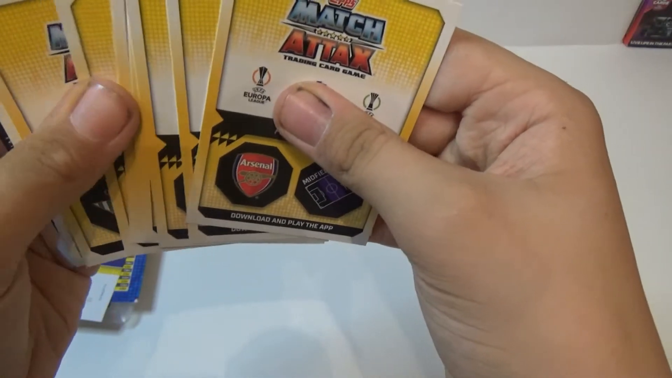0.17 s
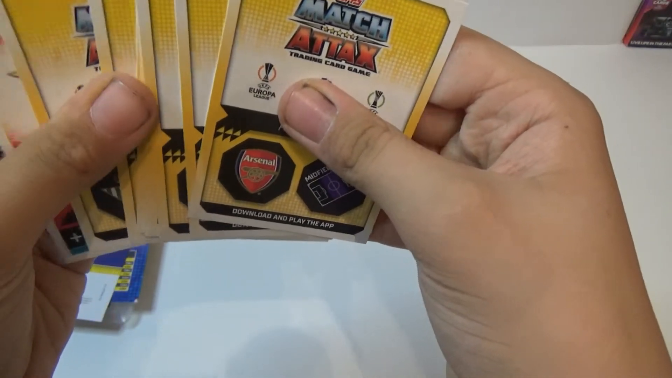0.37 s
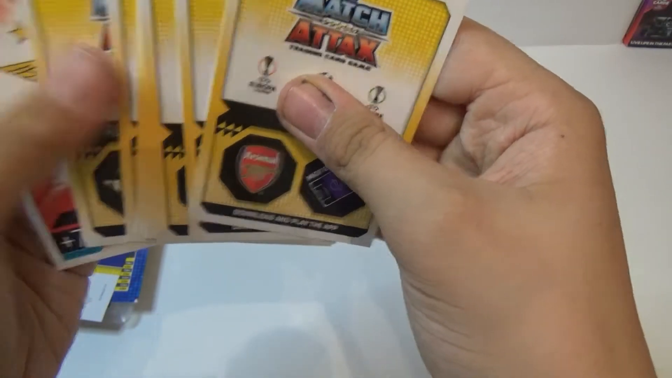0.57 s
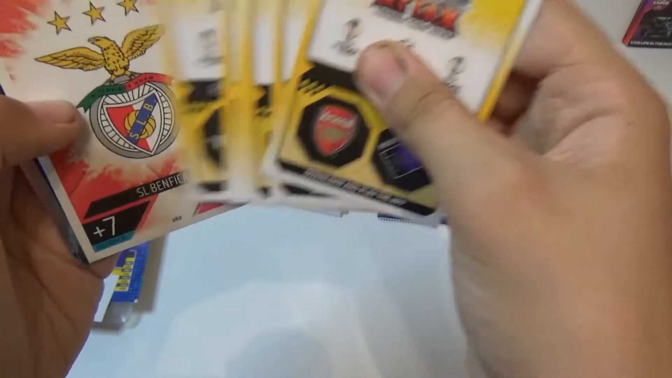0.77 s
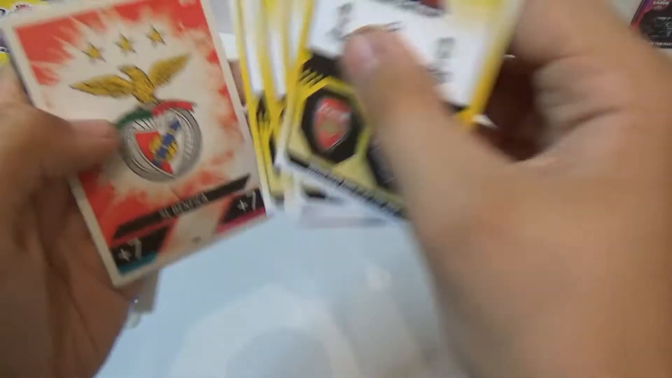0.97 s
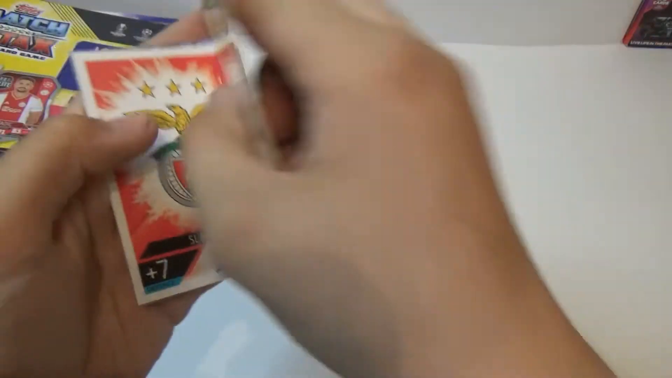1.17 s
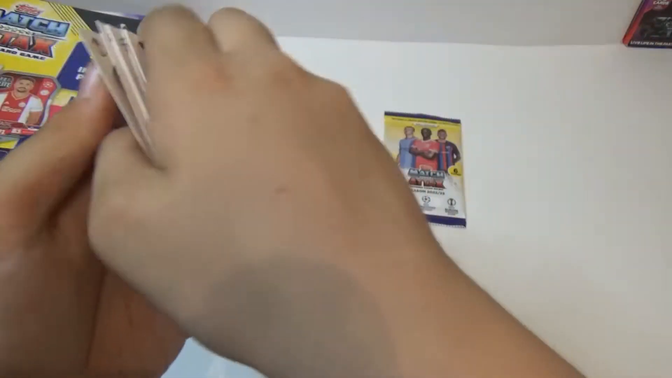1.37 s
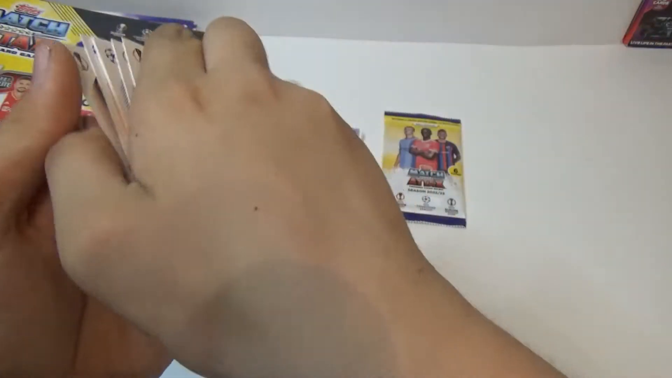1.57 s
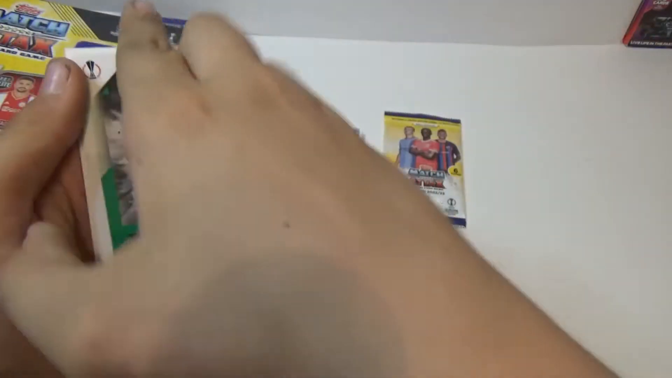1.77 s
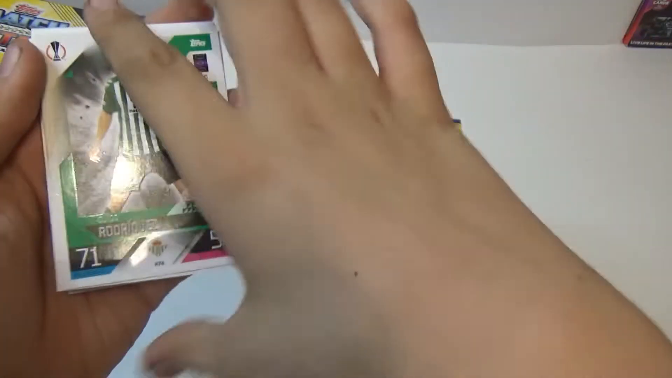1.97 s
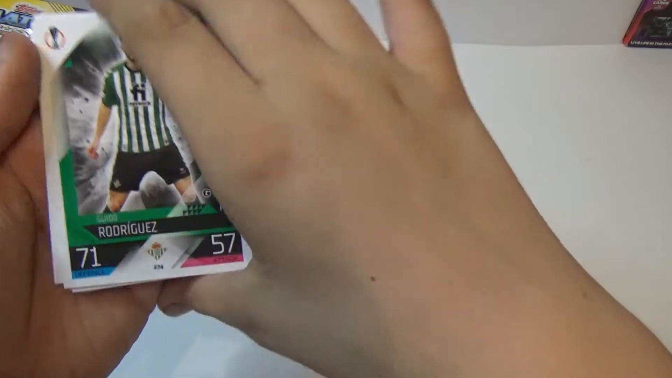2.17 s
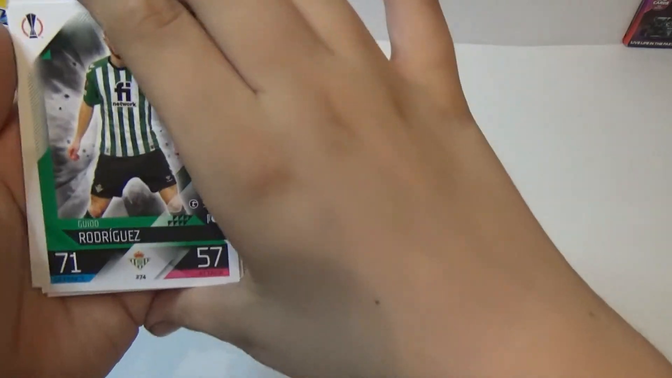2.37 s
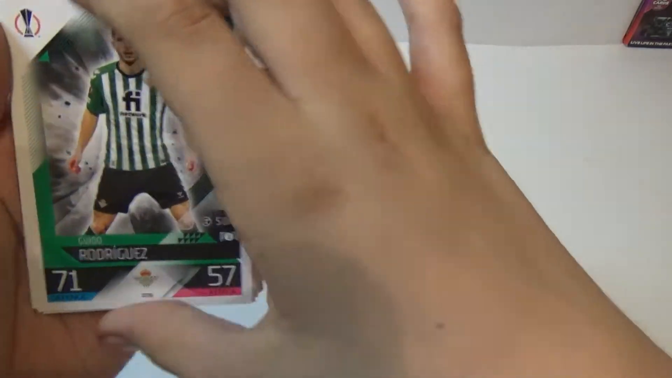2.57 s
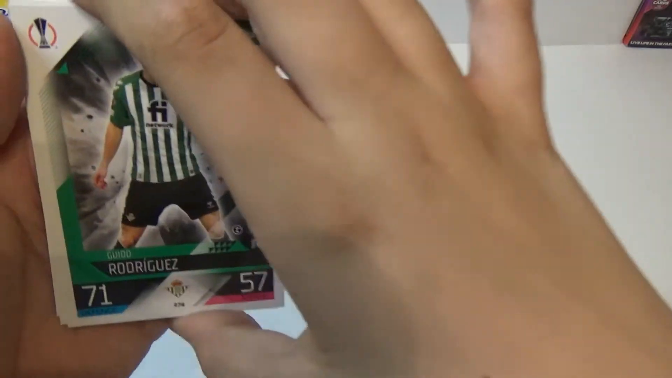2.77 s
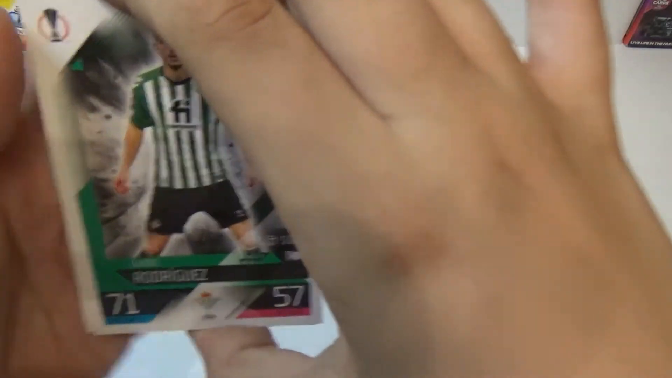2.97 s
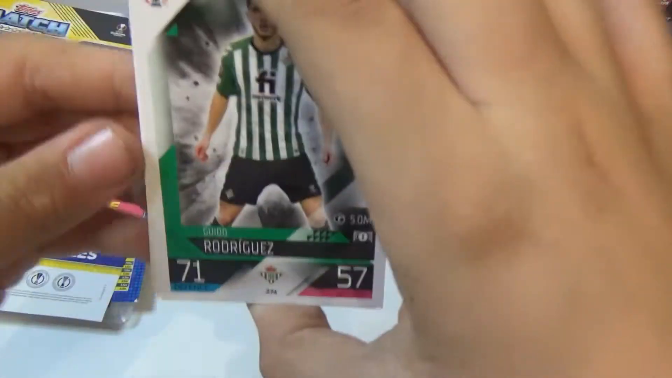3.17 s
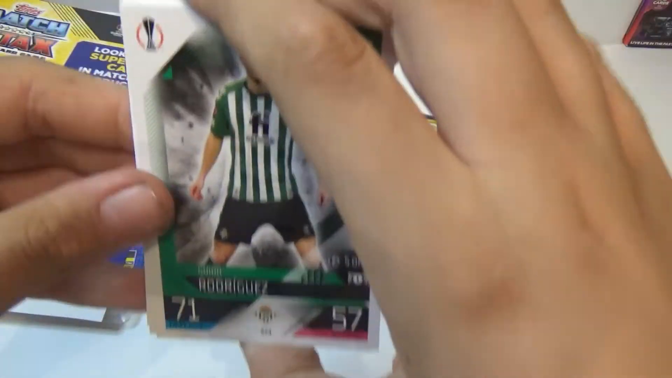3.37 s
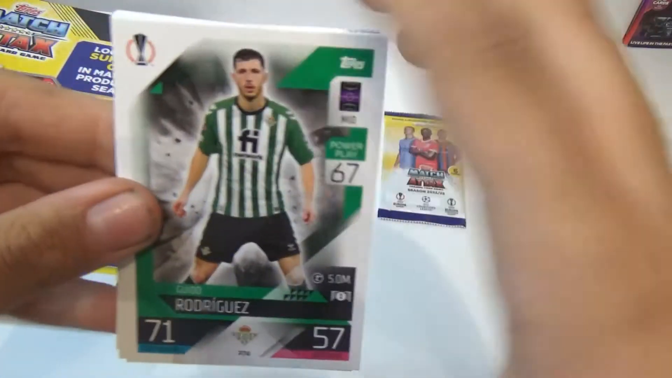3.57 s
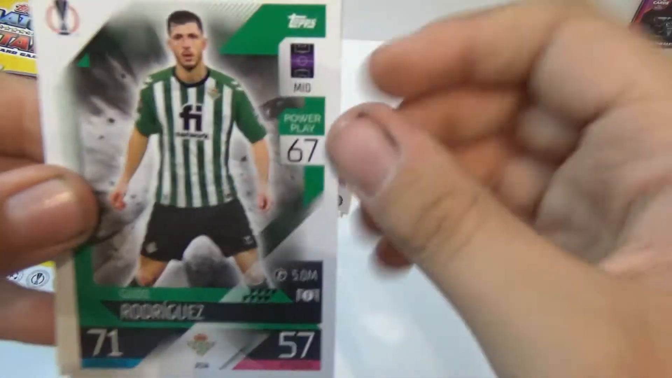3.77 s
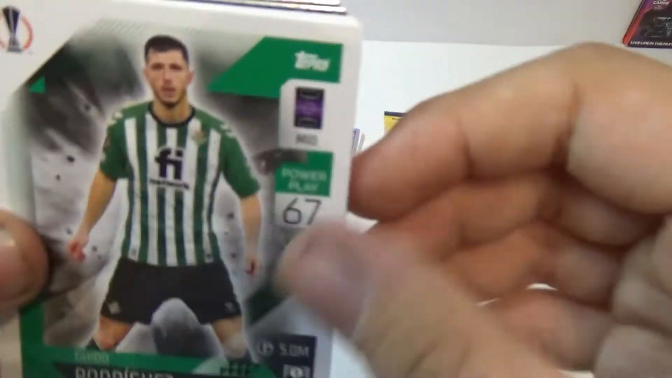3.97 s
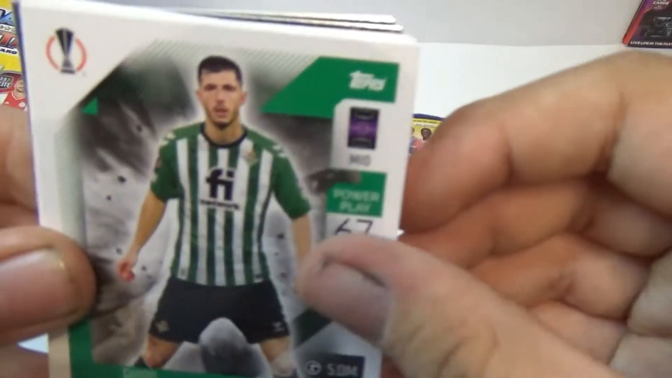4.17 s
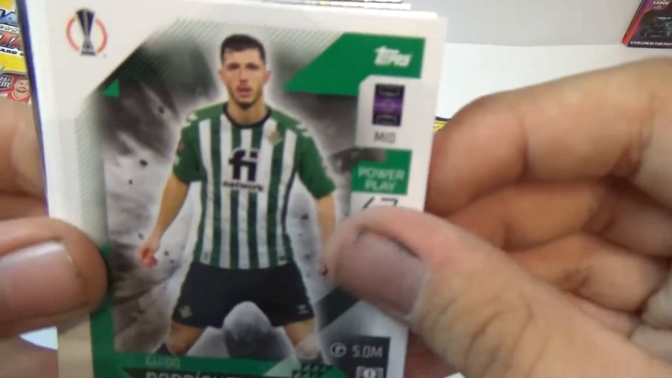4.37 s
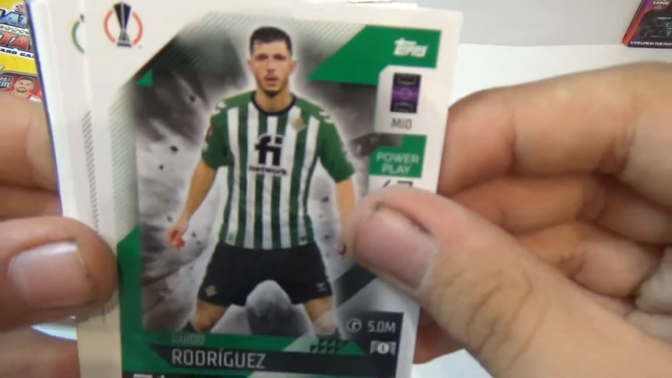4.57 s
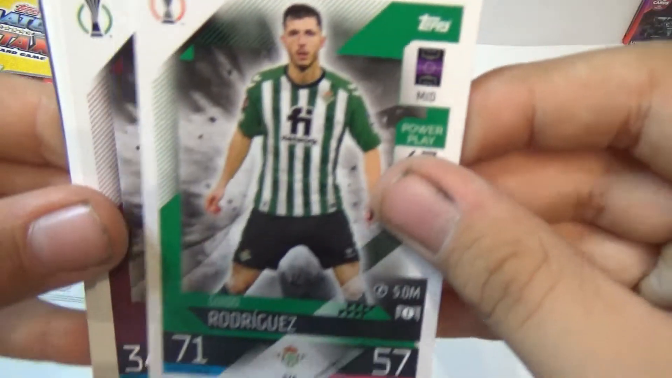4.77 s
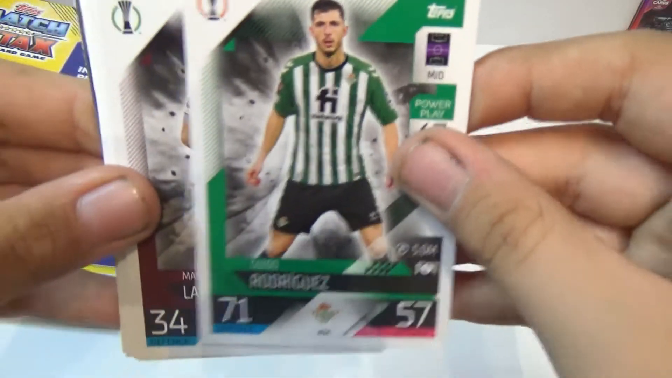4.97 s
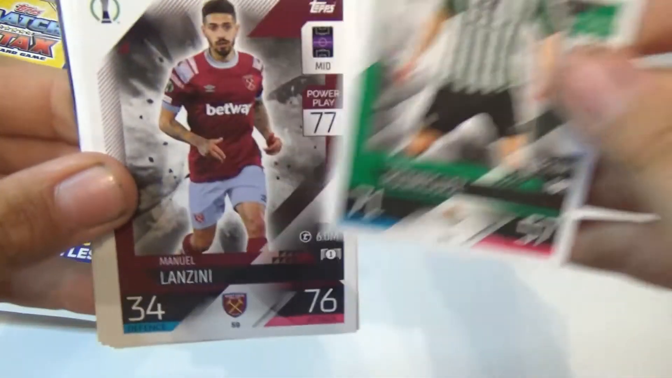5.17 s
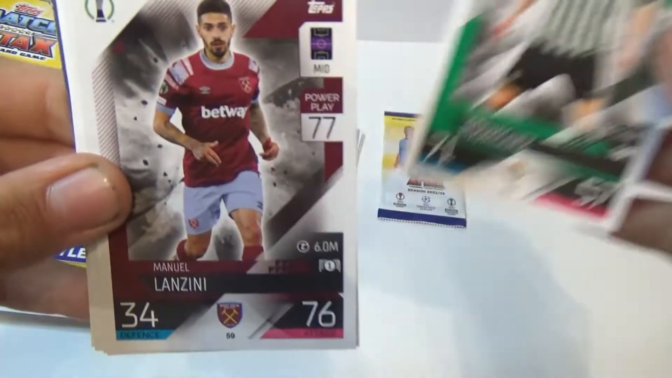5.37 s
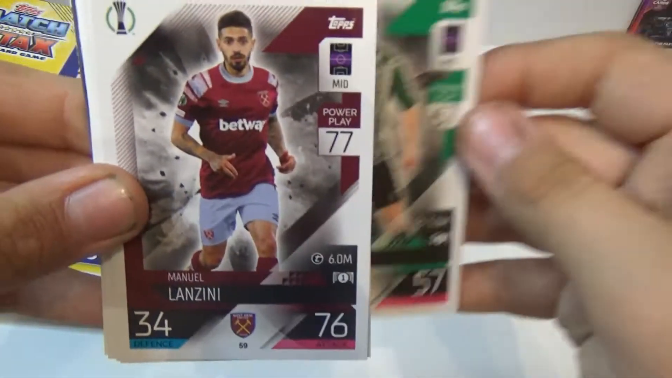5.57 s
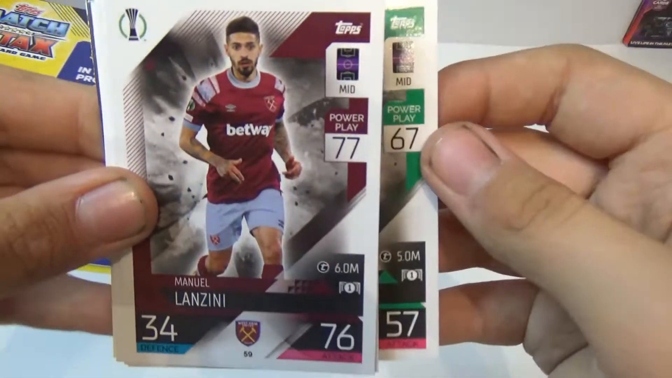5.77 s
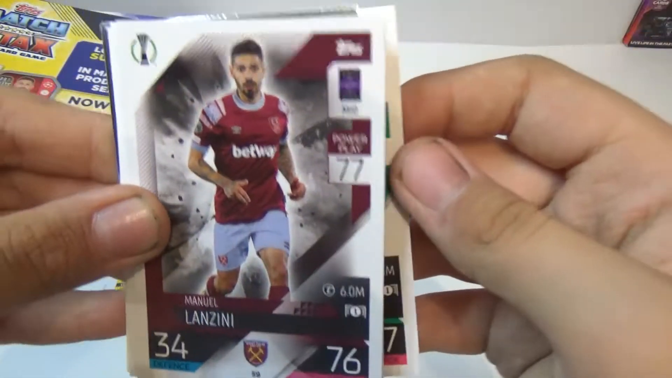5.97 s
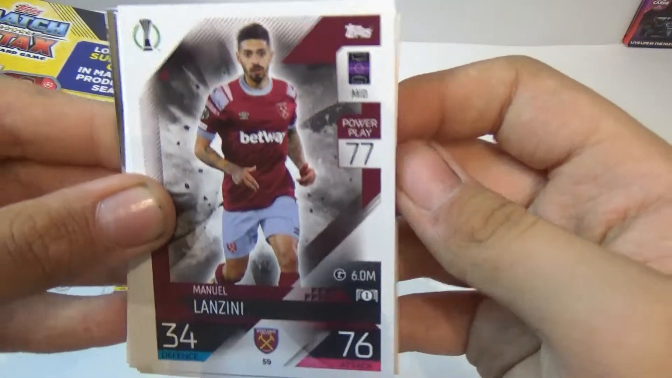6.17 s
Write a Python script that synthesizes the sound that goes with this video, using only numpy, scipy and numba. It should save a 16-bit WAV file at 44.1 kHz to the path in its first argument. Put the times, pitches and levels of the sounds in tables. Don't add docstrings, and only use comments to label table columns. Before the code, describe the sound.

A small quiet room, closely miked in stereo: a steady soft hush and faint fast camera-motor ticking. Stiff cards rustle and swish, edges click and corners flick, busiest in the first two seconds with a crisp crack. Afterwards there are only gentle slides and sparse taps, then a firm drag ending in one loud snap and faint final scuffs.

```python
import sys
import numpy as np
from scipy import signal
from scipy.fft import rfft, irfft
from scipy.io import wavfile
from numba import njit

SR = 44100
rng = np.random.default_rng(int(sys.argv[2]) if len(sys.argv) > 2 else 0)


def decibels_to_gain(level_db):
    exponent = np.asarray(level_db, float) / 20
    return 10 ** exponent


def unload_audio(sound):
    columns = np.transpose(np.atleast_2d(sound))
    steps = np.round(np.clip(columns, -1, 1) * 32767)
    wavfile.write(sys.argv[1], SR, steps.astype(np.int16))


N = 273684
RUB_PAN_DB = 1


def rms_one(x):
    return x / np.sqrt(np.mean(x ** 2) + 1e-20)


def at_hz(points, hz):
    point_hz, level_db = np.array(points).T
    return np.interp(np.log(hz + 1), np.log(point_hz), level_db)


def over_time(points):
    return np.interp(np.arange(N) / SR, *np.transpose(points))


def band(x, low, high):
    return signal.sosfilt(signal.butter(2, [low, min(high, .45 * SR)], "band", fs=SR, output="sos"), x)


def drift(rate):
    r = np.exp(-80 * np.pi * rate / SR)
    slow = signal.lfilter([1], [1, -2 * r, r * r], rng.standard_normal(N // 40 + 2002))[2000:]
    return np.interp(np.arange(N) / 40, np.arange(len(slow)), rms_one(slow))


def add(out, s, sound, pan_db):
    at = max(round(s * SR), 0)
    n = min(np.shape(sound)[-1], N - at)
    panned = sound * decibels_to_gain(np.array([[pan_db / 2], [-pan_db / 2]]))
    out[:, at:at + n] += panned[:, :n]


def glide(t, first_hz, last_hz, glide_ms):
    tau = glide_ms / 1000
    return 2 * np.pi * (last_hz * t + (first_hz - last_hz) * tau * (1 - np.exp(-t / tau)))


@njit
def moving_resonance(x, hz, r, sr):
    out = np.zeros(len(x))
    for i in range(2, len(x)):
        drive = x[i] - x[i - 2]
        out[i] = drive + 2 * r * np.cos(2 * np.pi * hz[i] / sr) * out[i - 1] - r * r * out[i - 2]
    return out


# (f/Hz, level/dB per Hz)
HUSH_MID_COLOUR = [(18, -56), (30, -28), (194, -0.5), (350, 2), (560, 0), (760, 3), (1040, -2.5), (1320, 3),
                   (1810, -3), (2060, -0.5), (2290, -1), (2680, -2), (3580, -5), (7470, -9), (9710, -8.5),
                   (14800, -10.5), (16000, -20)]
# (f/Hz, level/dB per Hz)
HUSH_SIDE_COLOUR = [(15, -86), (25, -56), (75, -40), (202, -14.5), (422, -4), (1300, -2), (1430, 0),
                    (1900, -5.5), (2050, -5), (3320, -10.5), (8100, -20.5), (9440, -26), (11000, -57),
                    (14300, -79), (22000, -120)]


def hush():
    hz = np.arange(N // 2 + 1) * SR / N
    layers = []
    for colour, level_db in ((HUSH_MID_COLOUR, -56.5), (HUSH_SIDE_COLOUR, -58)):
        spectrum = rfft(rng.standard_normal(N)) * decibels_to_gain(at_hz(colour, hz))
        layers.append(decibels_to_gain(level_db + .5 * drift(5.7)) * rms_one(irfft(spectrum, N)))
    mid, side = layers
    mid += decibels_to_gain(-80) * rms_one(band(rng.standard_normal(N), 10000, 19000))
    return np.array([mid + side, mid - side])


# (t/s, even level/dB, odd level/dB)
FOCUS_PUSH = [(0, -60, -49.5), (2.2, -55, -50), (2.4, -56, -52.5), (2.6, -57, -55), (2.72, -53.5, -54),
              (3.0, -54, -52), (3.4, -53.5, -52.5), (3.5, -55, -54), (3.56, -56, -50), (3.7, -58, -50.5),
              (3.85, -52.5, -52.5), (3.95, -52.5, -55), (4.25, -53, -54), (4.35, -50.5, -53),
              (4.45, -53, -51), (4.6, -53, -52.5), (4.72, -57, -52), (4.82, -55, -54), (4.9, -51.5, -52),
              (5.9, -53, -52), (6.0, -55, -51), (6.2, -54, -51)]


def focus_motor():
    step_s, wander, housing_hz = .04, .022, 2085
    # delay ms, last Hz, glide ms, chirp ms, housing ring dB
    quick_gait = (4.4, 2350, 2.5, 4.6, -56)
    slow_gait = (-4.5, 2400, 4.0, 12.0, -80)
    early_gait = (-1.5, 2350, 3.0, 6.0, -62)
    out, t = np.zeros((2, N)), np.arange(1500) / SR
    push_s, even_db, odd_db = np.transpose(FOCUS_PUSH)
    chance = rng.standard_normal((int(N / SR / step_s) + 1, 3))
    for k, (push, ring, turn) in enumerate(chance):
        s = k * step_s
        gait = slow_gait if 4.39 <= s < 5.97 else quick_gait
        if 4.47 <= s < 4.86:
            gait = early_gait
        delay_ms, last_hz, glide_ms, chirp_ms, ring_db = gait
        push_db = np.interp(s, push_s, odd_db if k % 2 else even_db) + 1.2 + .6 * push
        port_phase = turn + np.array([[.4], [0]])
        phase = glide(t, 3140, last_hz, glide_ms) * (1 + wander * ring) + port_phase
        chirp_shape = np.sin(np.pi * np.minimum(t * 1000 / chirp_ms, 1)) ** .7
        step = decibels_to_gain(push_db) * chirp_shape * np.sin(phase)
        ring_start_s, ring_length_s = np.array([[.007], [.004]]), np.array([[.017], [.021]])
        swell = np.sin(np.pi * np.clip((t - ring_start_s) / ring_length_s, 0, 1))
        hum = 2 * np.pi * housing_hz * t + 3 * turn + np.array([[1.9], [0]])
        step += decibels_to_gain(ring_db + 2 * (-1) ** k + 1.5 * ring) * swell * np.sin(hum)
        step += decibels_to_gain(ring_db - 5) * np.exp(-((t - .006) / .002) ** 2) * np.sin(2 * hum[1])
        add(out, s + delay_ms / 1000, step, 0)
    return out


# (t/s, hiss level/dB)
GRIP = [(0.0, -52.5), (0.34, -55), (0.67, -51), (0.81, -52), (1.0, -43.5), (1.42, -45.5), (1.73, -47.5),
        (1.86, -53), (3.04, -57.5), (4.83, -59), (5.25, -55), (5.35, -59), (5.59, -59), (6.2, -54)]


def stirred_air():
    busy_db = over_time(GRIP) + 55
    swing_db = 7 * drift(5)
    mid, side = band(rng.standard_normal((2, N)), 15, 116) * decibels_to_gain(swing_db + .8 * busy_db)
    return decibels_to_gain(-89.5) * rms_one(np.array([mid + .3 * side, mid - .3 * side]))


# (start t/s, length/ms, hiss level/dB, moment of most pressure/0-1)
GLIDES = [(0.02, 140, -51, 0.47), (0.21, 63, -46.5, 0.74), (0.38, 115, -52.5, 0.43),
          (0.465, 30, -47.5, 0.63), (0.665, 180, -44.5, 0.45), (0.902, 26, -42, 0.05),
          (1.064, 97, -35, 0.42), (1.628, 75, -34.5, 0.47), (1.699, 68, -37, 0.29), (1.799, 89, -40, 0.41),
          (1.879, 32, -47, 0.5), (2.134, 55, -46.5, 0.13), (2.488, 33, -44.5, 0.3), (2.686, 23, -50.5, 0.5),
          (2.714, 70, -49.5, 0.44), (3.035, 52, -48.5, 0.82), (3.15, 57, -52, 0.8), (3.515, 40, -41.5, 0.2),
          (3.865, 81, -46, 0.16), (4.075, 39, -50.5, 0.1), (4.34, 100, -57, 0.7), (4.46, 70, -50, 0.05),
          (4.855, 20, -51, 0.16), (5.003, 50, -48.5, 0.4), (5.095, 66, -49, 0.3), (5.5, 44, -58, 0.74),
          (5.87, 59, -49.5, 0.43), (0.735, 45, -44, 0.9), (1.05, 22, -44, 0.5), (1.148, 22, -42, 0.5),
          (1.626, 12, -39, 0.1), (1.694, 14, -41, 0.5), (1.775, 28, -50, 0.8), (3.24, 14, -53, 0.3),
          (3.3, 30, -56, 0.4), (3.373, 10, -52, 0.1), (5.06, 36, -57, 0.5)]
SCRAPES = [(0.52, 79, -48.5, 1), (1.159, 84, -37.5, 0.2), (1.36, 176, -49, 0.66), (1.578, 26, -39, 0.75),
           (1.605, 8, -42, 0.5), (2.06, 45, -48, 0.4), (2.2, 170, -50, 0.14), (2.418, 33, -53.5, 0.2),
           (2.91, 37, -51.5, 0.25), (2.95, 41, -56.5, 0.4), (3.2605, 11, -42, 0.7), (4.64, 62, -53, 0.5),
           (5.37, 63, -55.5, 0.2), (5.98, 28, -51.5, 0)]
DRAGS = [(1.0, 59, -43, 0.86), (1.23, 50, -45.5, 0), (1.321, 24, -45, 0.3), (4.0, 29, -55, 0.86),
         (5.129, 126, -39.5, 0.66), (5.621, 33, -46, 0.17), (5.659, 43, -46, 0.18), (5.7, 51, -57.5, 0.24),
         (6.04, 30, -60, 0.34), (6.15, 72, -47, 0.98)]
PUSHES = [
    (0.815, 39, -51, 0.3),
    (3.74, 130, -59.5, 0.57),
    (5.13, 54, -55, 0.63),
    (5.255, 96, -64.5, 0.4),
]
SWEEP = [
    (0.762, 142.4, -30.5, 0.5),
]


def pressure():
    grip_db = over_time(GRIP) + np.array([[-3.0], [-9.0], [-9.0]])
    power = decibels_to_gain(2 * grip_db)
    # strokes, rasp and body in dB against their hiss
    kinds = ((GLIDES, -9, -10.5), (SCRAPES, -4, -7.5), (DRAGS, -3.5, -3.5), (PUSHES, -0.5, 7),
             (SWEEP, -12.5, -8.5))
    for rows, rasp_db, body_db in kinds:
        for start_s, length_ms, hiss_db, top in rows:
            at = round((start_s - .002) * SR)
            length_ms = length_ms + 5
            u = np.linspace(0, 1, round(length_ms * SR / 1000))[:N - at]
            top = np.clip(top, .03, .97)
            edges = np.minimum(np.minimum(u, 1 - u) * length_ms / (2.5 + .09 * length_ms), 1)
            swell_db = -(5 + 0.23 * length_ms) * np.abs(u - top) ** 2.08
            level_db = hiss_db + swell_db + np.array([[0], [rasp_db], [body_db]])
            power[:, at:at + len(u)] += (edges * decibels_to_gain(level_db)) ** 2
    return np.sqrt(power)


def slips(per_s, spread_db):
    sizes = decibels_to_gain(spread_db * np.minimum(rng.exponential(1, N), 5)) * rng.choice([-1, 1], N)
    happens = rng.random(N) < per_s / SR
    return rms_one(sizes * happens * decibels_to_gain(0.76 * drift(71)))


CARD_RINGS_HZ = [1350, 1784, 2556, 3480, 4390, 5400, 6100, 7000, 8400, 9300, 10690]


def card_rings(grains):
    hiss, rasp, body = np.zeros((3, N))
    for hz in CARD_RINGS_HZ:
        ring = rms_one(band(grains, hz * .97, hz * 1.03)) * decibels_to_gain(-19 + 4 * drift(35))
        layer = hiss if hz > 5000 else rasp if hz > 2500 else body
        layer += ring
    return np.array([hiss, rasp, body])


# (f/Hz, level/dB per Hz within each of hiss, rasp and body)
RUB_COLOUR = [(300, -12.5), (600, 0.5), (1300, 5.5), (2800, 5), (5000, 4.5), (7500, 5), (9700, 6),
              (12000, -0.5), (16000, -23)]
# (t/s, resonance f/Hz)
GAP = [(0, 5300), (.2, 5400), (.4, 9700), (.72, 9300), (.765, 5400), (.835, 6150), (.85, 9100),
       (1.66, 10200), (1.72, 7000), (1.85, 9300), (4.5, 10400), (4.67, 10000), (5.02, 6100), (5.15, 9900),
       (5.24, 4580), (5.9, 6300), (6.2, 6200)]
# (t/s, resonance f/Hz)
SPAN = [(0, 1310), (.78, 850), (.83, 1200), (.9, 1400), (1.2, 1570), (3.8, 1350), (5.1, 865), (5.24, 875),
        (5.6, 780), (6.2, 1320)]


def rub():
    gap_width_hz, span_width_hz = 900, 350
    grains = [slips(8000, 2.8), slips(7000, 2.4)]
    ranges = {"body": 0, "rasp": 0, "hiss": 0}
    edges = 315 * 2 ** np.arange(0, 5.8, 1 / 3)
    for k, (low, high) in enumerate(zip(edges, edges[1:])):
        name = "body" if high < 2600 else "rasp" if high < 5100 else "hiss"
        patch = decibels_to_gain(at_hz(RUB_COLOUR, np.sqrt(low * high)) + 2.0 * drift(30))
        ranges[name] = ranges[name] + patch * band(grains[k % 2], low, high)
    gap_hz = over_time(GAP) * (1 + 0.013 * drift(27))
    gap = moving_resonance(grains[0], gap_hz, np.exp(-np.pi * gap_width_hz / SR), SR)
    span = moving_resonance(grains[1], over_time(SPAN), np.exp(-np.pi * span_width_hz / SR), SR)
    hiss = rms_one(ranges["hiss"]) + decibels_to_gain(-10.5) * rms_one(gap)
    body = rms_one(ranges["body"]) + decibels_to_gain(-4) * rms_one(span)
    faces = np.array([hiss * decibels_to_gain(-1.5), rms_one(ranges["rasp"]), rms_one(body)])
    faces = faces + card_rings(grains[1])
    press = pressure()
    mid = np.sum(press * faces * decibels_to_gain(-1.57), axis=0)
    brighter = (press[0] / decibels_to_gain(-37)) ** .3
    mid += decibels_to_gain(-15) * press[0] * brighter * rms_one(band(grains[1], 11230, 15400))
    side = decibels_to_gain(-15) * band(np.roll(mid, 23), 3300, 10300)
    scatter = np.sum(press * np.roll(faces, 5000, axis=1), axis=0)
    side += decibels_to_gain(-17.5) * band(scatter, 1500, 9400)
    return np.array([mid + side, mid - side]) * decibels_to_gain(np.array([[RUB_PAN_DB / 2], [-RUB_PAN_DB / 2]]))


def contacts(rows, length_ms, swell, width, click, gain_db):
    out, t = np.zeros((2, N)), np.arange(2500) / SR
    noise = rng.standard_normal((len(rows), 2, len(t)))
    for (s, peak_db, hz, thump_db), (bright, dull) in zip(rows, noise):
        u = t / (max(length_ms, .2) / 1000)
        shape = (1 - np.exp(-u / swell)) * np.exp(-u ** 2 - u / 2)
        sharp = rms_one(band(bright, hz / width, hz * width)) + .5 * rms_one(band(bright, 4600, 10900))
        edge = band((t == t[8]) * 1.0, hz / 1.7, min(hz * 2.1, 12000))
        thump = decibels_to_gain(thump_db) * rms_one(band(dull, 285, 2350)) * shape ** 0.86
        puff = shape * sharp + click * edge / edge.max() + thump
        add(out, s + .0004, decibels_to_gain(peak_db + gain_db) * puff, RUB_PAN_DB)
    return band(out, 146, 12000)


# (t/s, peak level/dB, brightest f/Hz, thump level/dB above peak)
TICKS = [(0.1153, -33, 5350, -22), (0.249, -35, 5410, -12), (0.574, -22.5, 9900, -9),
         (0.5884, -34, 10200, -3), (0.5904, -30, 10000, -22), (0.6351, -33, 3960, -1),
         (0.663, -31.5, 9500, -12), (1.0167, -33, 7530, -12), (1.0326, -23, 2900, 1.5),
         (1.0976, -19, 5400, -5), (1.1052, -18.5, 5000, -12), (1.1388, -25, 4600, -3),
         (1.3256, -26.5, 8500, -9), (3.152, -36, 7400, -19), (3.1567, -35.5, 8980, -25),
         (3.3725, -42, 7880, -41), (3.896, -35, 5910, -21), (4.0725, -37, 7970, -32),
         (4.4598, -34.5, 7000, -25), (5.6223, -29, 3830, -4), (5.6376, -30, 3490, -16),
         (5.659, -35.5, 4910, 5.5), (5.6923, -43, 5630, 0), (5.8888, -41, 6210, -24),
         (5.8996, -34.5, 9460, -19), (5.979, -37.5, 7500, -18), (6.036, -43, 6160, 8.5),
         (1.2432, -27, 9800, -14), (3.6205, -46, 2400, 3), (1.548, -38, 4500, -8), (1.7505, -33, 5200, -12),
         (1.677, -24, 4300, -8), (1.187, -30, 6800, -6)]


def ticks():
    return contacts(TICKS, length_ms=2.53, swell=.04, width=1.6, click=1.8, gain_db=-6)


# (start t/s, length/ms, peak level/dB, first f/Hz, last f/Hz)
WHISTLES = [(0.214, 5, -46, 5400, 5400), (0.2485, 5.5, -41, 5500, 5300), (0.255, 7.6, -43, 1000, 1250),
            (0.764, 51, -36, 5300, 6020), (0.816, 18.4, -31.5, 5880, 6250), (0.805, 22, -34, 9500, 9300),
            (0.822, 40, -31.5, 8000, 8700), (0.868, 12, -31, 9200, 9000), (0.822, 33, -36.5, 1300, 1500),
            (0.882, 8.5, -35.5, 1700, 1700), (1.004, 8, -42, 2900, 2800), (1.015, 7, -44, 2300, 2000),
            (1.016, 5, -38, 7400, 7500), (1.047, 9, -44, 2780, 3100), (1.107, 5.5, -31, 4880, 4330),
            (1.112, 4, -32, 6260, 5800), (1.588, 15, -35.5, 9300, 9300), (1.59, 12, -38.5, 6600, 6800),
            (1.664, 21, -29.5, 9100, 9440), (1.673, 9.4, -26, 10300, 10300), (1.675, 9.8, -28, 2610, 2460),
            (1.674, 8.6, -29, 4300, 4300), (1.71, 12, -33, 7000, 7000), (1.748, 8.3, -38, 4300, 4500),
            (1.749, 8, -36, 5170, 5300), (1.84, 15, -38.5, 9450, 9300), (1.835, 14, -40, 6220, 6100),
            (2.07, 15, -45, 3500, 3700), (2.215, 20, -49.5, 3600, 3800), (2.494, 9, -47.5, 3700, 3700),
            (3.2593, 5, -37, 2000, 2600), (3.263, 6.8, -40, 2020, 1710), (3.262, 6, -37, 8600, 7800),
            (3.267, 6.6, -34.5, 8300, 8800), (3.269, 5, -37.5, 2600, 2600), (4.363, 13, -53, 2950, 2950),
            (5.15, 12, -41, 9800, 10200), (5.158, 22, -44, 11500, 12200), (5.222, 8, -37, 1700, 1700),
            (5.268, 38, -50, 1350, 1480), (6.04, 52, -55, 6200, 6700), (5.892, 30, -51, 6900, 5900),
            (5.012, 26, -45, 5500, 6200), (3.524, 28, -44, 6600, 6000)]
# (overtone number, level/dB)
SQUEAK_TONES = [(2, -39), (3, -44), (4, -47)]


def whistles():
    width_share, top = .045, 0.65
    out = np.zeros((2, N))
    noise = rng.standard_normal((len(WHISTLES), 2, 3000))
    for (s, length_ms, peak_db, first_hz, last_hz), pair in zip(WHISTLES, noise):
        u = np.linspace(0, 1, min(round(length_ms * SR / 1000), 2500))
        low_pass = signal.butter(2, width_share * first_hz, fs=SR, output="sos")
        a, b = signal.sosfilt(low_pass, pair)[:, -len(u):]
        flutter = (.6 + (a + 1j * b) / np.sqrt(np.mean(a ** 2 + b ** 2))) / 1.2
        turn = np.exp(2j * np.pi * np.cumsum(first_hz + (last_hz - first_hz) * u) / SR)
        shape = np.sin(np.pi * u ** (np.log(.5) / np.log(top))) ** .7
        add(out, s, decibels_to_gain(peak_db) * shape * np.real(flutter * turn), RUB_PAN_DB)

    squeak_s, squeak_ms, first_hz, last_hz = 5.0985, 10, 3150, 3750
    u = np.linspace(0, 1, round(squeak_ms * SR / 1000))
    slip_hz = first_hz + (last_hz - first_hz) * np.sin(np.pi / 2 * np.minimum(u * 1.4, 1))
    phase = 2 * np.pi * np.cumsum(slip_hz) / SR
    for overtone, level_db in SQUEAK_TONES:
        shape = np.sin(np.pi * u ** (4 / round(overtone)))
        add(out, squeak_s, decibels_to_gain(level_db) * shape * np.sin(round(overtone) * phase), 0)
    return out


# (t/s, peak level/dB, brightest f/Hz, thump level/dB above peak)
SCUFFS = [(0.2483, -34, 7500, -3), (0.8304, -24, 8400, -33), (1.1196, -23, 9810, 0),
          (1.1797, -30, 10200, -21), (1.325, -35, 9700, -30), (1.506, -27, 2390, -14),
          (1.589, -26, 4700, -7), (1.6272, -28, 2620, -26), (1.672, -22, 7000, -14), (1.8, -33, 4540, -7),
          (3.261, -28, 6600, -22), (3.5218, -27, 4900, -22), (3.5214, -25.5, 8600, -15),
          (4.0163, -34, 4200, -5), (5.016, -30, 6240, -25), (5.19, -26, 5600, 1), (5.2234, -32, 2020, 1)]


def scuffs():
    return contacts(SCUFFS, length_ms=10, swell=0.35, width=1.125, click=0, gain_db=-11.0)


# (t/s, peak level/dB, settled f/Hz, ring/ms)
SNAPS = [(0.249, -47, 275, 9.0), (.5745, -33, 600, 2.8), (0.637, -33, 905, 1), (1.0333, -23, 990, 0.8),
         (1.0981, -8, 1350, 1.2), (1.0985, -15, 3400, 1.6), (1.0992, -12.5, 1290, 1.5),
         (1.1056, -15, 3370, 1.2), (1.108, -48, 130, 14), (1.0985, -29.5, 517, 9.3), (1.106, -12, 900, 1),
         (1.123, -27, 1300, 2.2), (3.612, -48.5, 102, 26), (3.621, -37.5, 710, 2.5),
         (5.2505, -21, 287, 5.4), (5.2505, -17.5, 423, 2.9), (5.253, -27, 720, 4), (5.2535, -29, 1700, 2.5),
         (5.2497, -19, 2310, 0.95), (5.278, -44, 330, 7), (5.252, -36, 190, 9), (5.2495, -7.5, 3400, 0.7),
         (5.2504, -10, 1190, 1.35), (5.251, -38, 109, 6), (5.6226, -29.5, 270, 2), (5.66, -35, 515, 2.9),
         (5.664, -54, 101, 11), (6.036, -33, 895, 1.3), (6.0362, -32, 2300, .6), (3.266, -36, 1150, 2),
         (3.6205, -42, 1500, 1.2), (1.1, -53, 75, 18), (1.04, -58, 70, 15), (5.252, -54, 55, 12),
         (1.1395, -24, 1200, 1)]


def snaps():
    spread_cycles, glide_share = 1.75, 0.43
    out, t = np.zeros((2, N)), np.arange(4000) / SR
    noise = rng.standard_normal((len(SNAPS), len(t)))
    for (s, peak_db, last_hz, ring_ms), hiss in zip(SNAPS, noise):
        first_hz = last_hz + spread_cycles * 1000 / ring_ms
        shape = (1 - np.exp(-t * first_hz * 1.5)) * np.exp(-t * 1000 / ring_ms)
        ring = shape * np.sin(glide(t, first_hz, last_hz, glide_share * ring_ms))
        crack = 0.67 * band(hiss, last_hz / 2, first_hz * 1.16) * shape
        add(out, s, decibels_to_gain(peak_db - 2.0) * (ring + crack), .6)
    return out


# (t/s, peak level/dB, brightest f/Hz, thump level/dB above peak)
FLICKS = [(1.0978, -17, 9500, -30), (1.1058, -22, 10500, -30), (5.2492, -16, 4800, -30),
          (1.8722, -26, 8100, -30), (5.0972, -38, 11000, -30), (0.8212, -20, 8000, -20),
          (0.8325, -18, 6500, -18), (0.79, -25, 7200, -20), (0.8135, -23, 9000, -20),
          (0.8725, -23, 9600, -20), (0.8935, -25, 10000, -20), (5.194, -30, 5000, -10),
          (3.5495, -38, 9000, -25), (2.7205, -39, 9000, -30), (3.7848, -37.5, 5660, -20),
          (3.915, -36, 6000, -25), (4.0721, -29, 8800, -32), (4, -42, 6000, -20), (4.436, -40, 10000, -30),
          (1.332, -37, 9800, -20), (2.4955, -35, 9900, -20), (6.0362, -38, 2500, -8),
          (5.9195, -39, 8000, -25)]


def flicks():
    return contacts(FLICKS, length_ms=0.47, swell=.04, width=1.6, click=3.0, gain_db=-9)


def room(x):
    t60_s = 0.11
    t = np.arange(int(t60_s * SR)) / SR
    scatter = band(rng.standard_normal((2, len(t))), 240, 8600) * decibels_to_gain(-60 * t / t60_s) * (t > .0015)
    scatter /= np.sqrt(np.sum(scatter ** 2, axis=1, keepdims=True))
    return decibels_to_gain(-19) * signal.fftconvolve(x, scatter, axes=1)[:, :N]


# (t/s, pan level/dB)
HANDS = [(0, -.5), (.83, 0), (1.1, -0.5), (1.69, 1), (2, 0.5), (5.05, -.5), (5.25, -2.5), (5.4, -.5),
         (6.2, 0)]


def scene():
    cards = rub() + ticks() + whistles() + scuffs() + snaps() + flicks()
    cards = cards * decibels_to_gain(over_time(HANDS) * np.array([[.5], [-.5]]))
    return hush() + focus_motor() + stirred_air() + cards + room(cards)


def band_limit(x):
    return signal.sosfilt(signal.butter(12, 16110, fs=SR, output="sos"), x)


def record(dry):
    overload, top_hz = .9, 16150
    rounded = overload * np.tanh(dry / overload)
    mix = signal.sosfilt(signal.cheby2(18, 50, top_hz, fs=SR, output="sos"), rounded)
    return band_limit(mix)


dry = scene()
out = record(dry)
unload_audio(out)
```